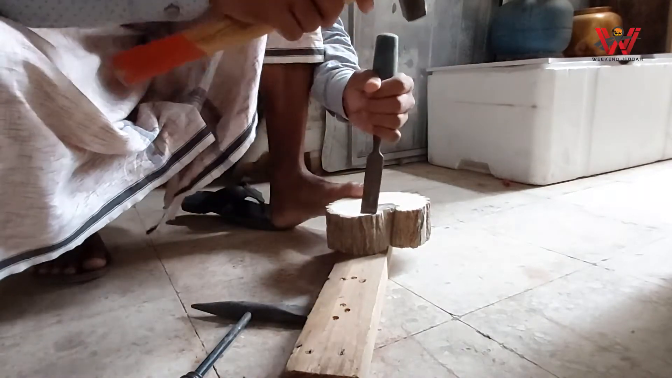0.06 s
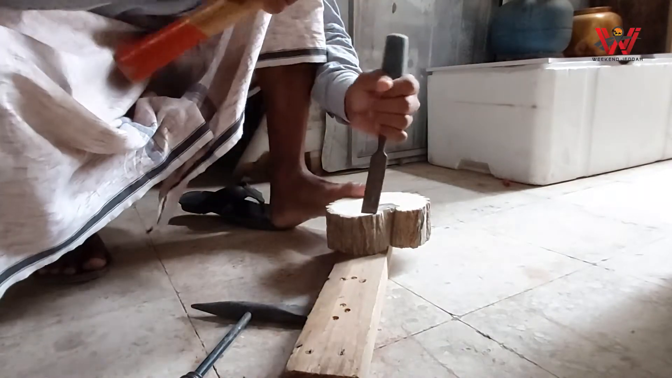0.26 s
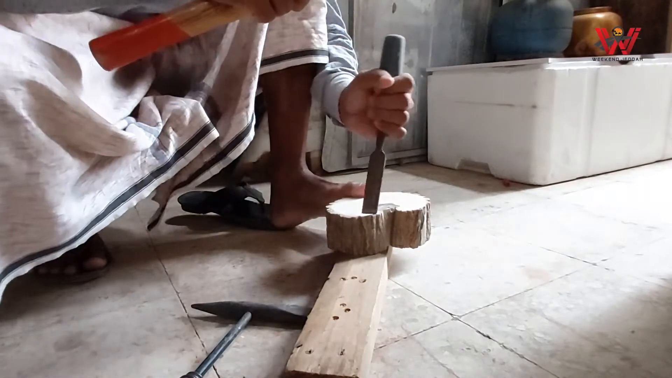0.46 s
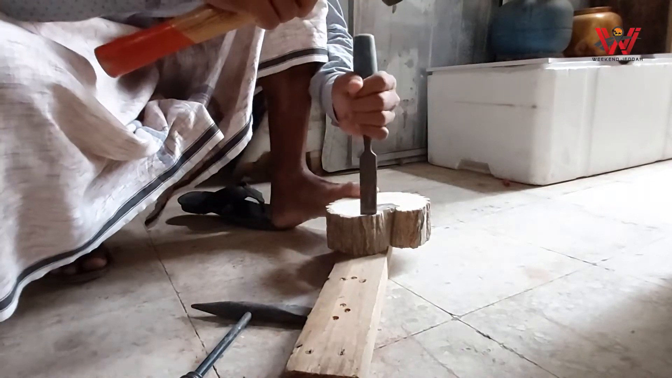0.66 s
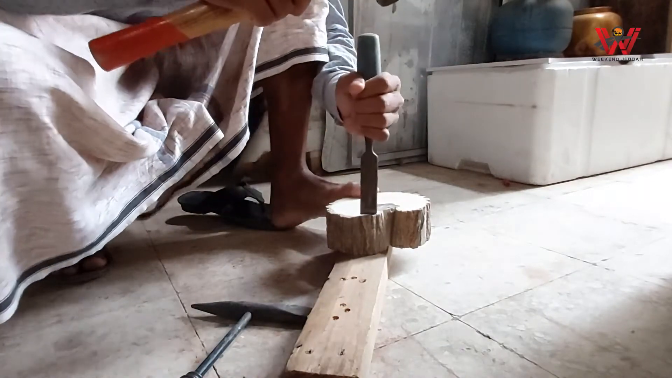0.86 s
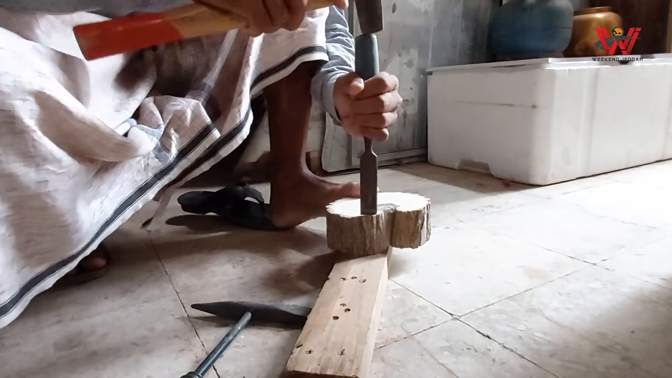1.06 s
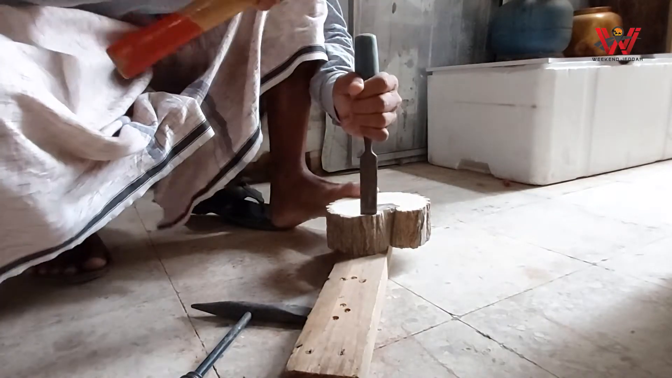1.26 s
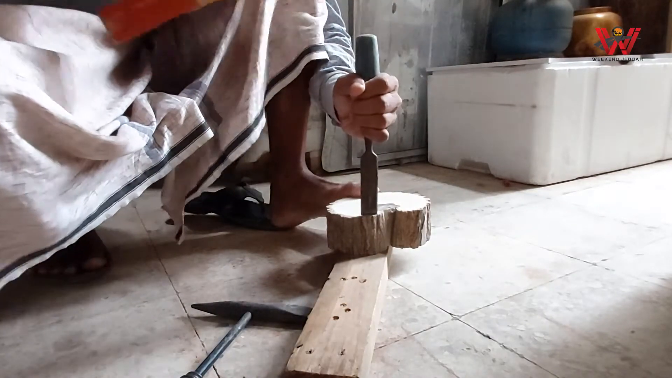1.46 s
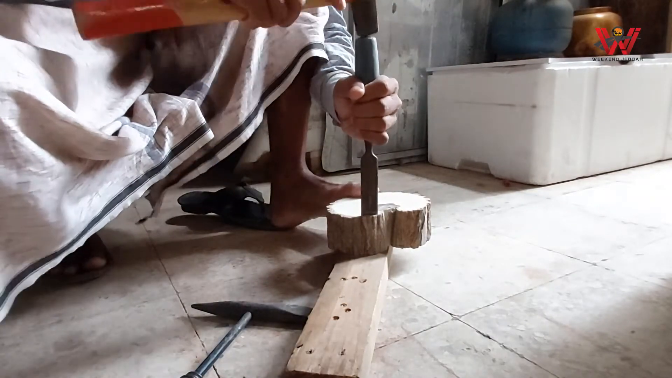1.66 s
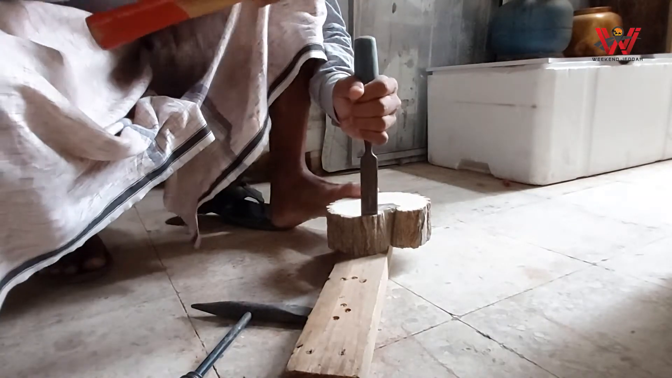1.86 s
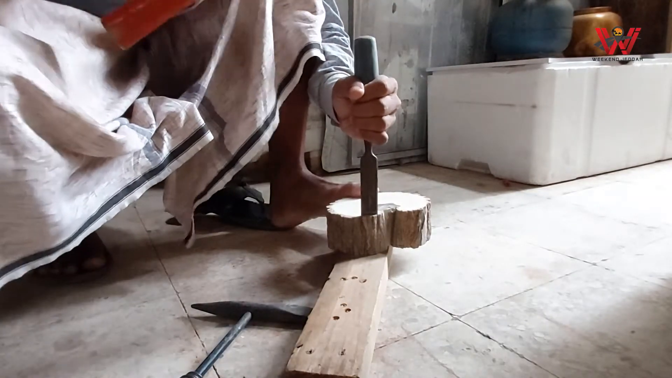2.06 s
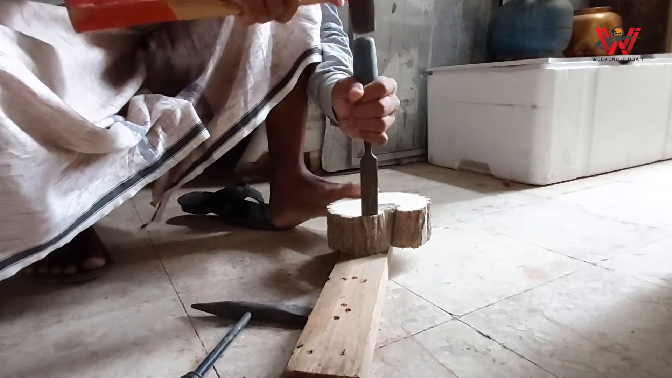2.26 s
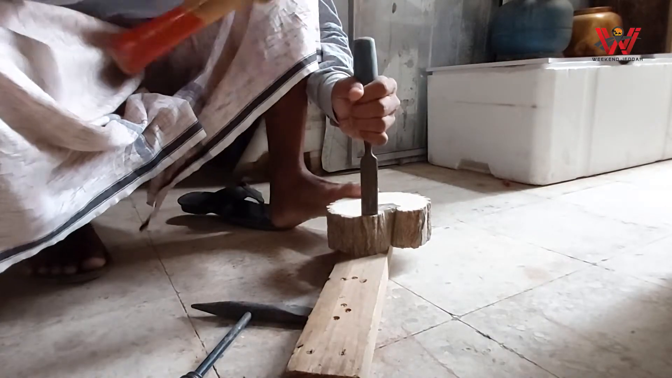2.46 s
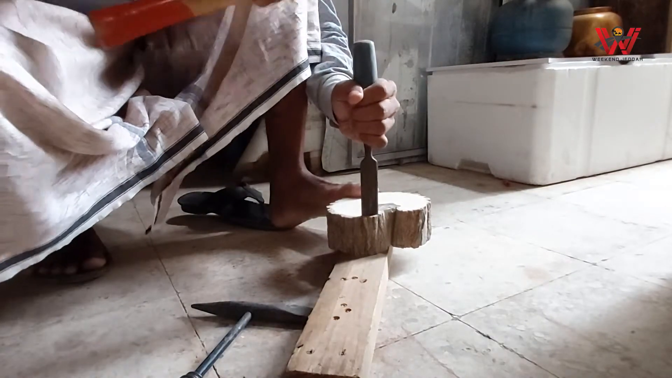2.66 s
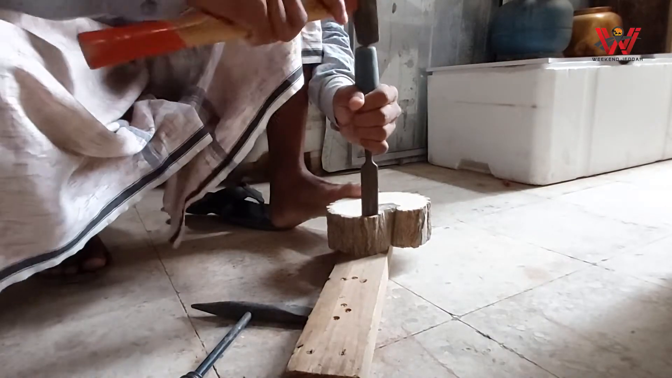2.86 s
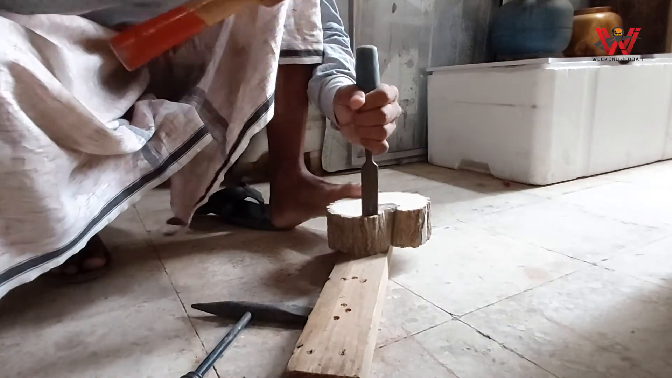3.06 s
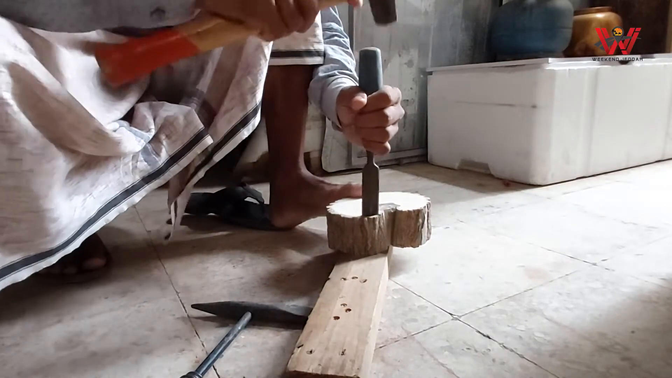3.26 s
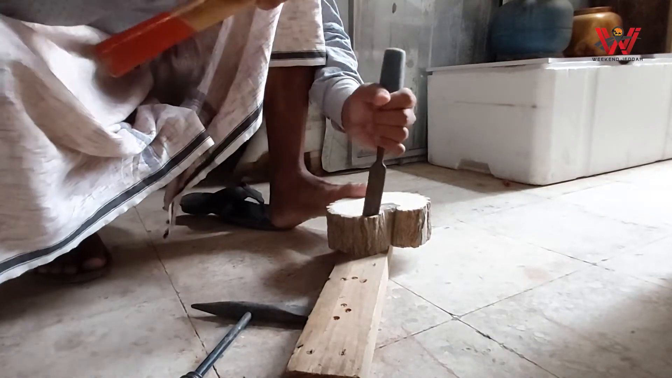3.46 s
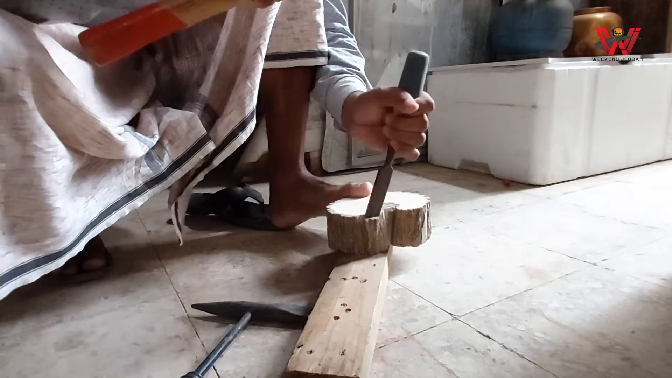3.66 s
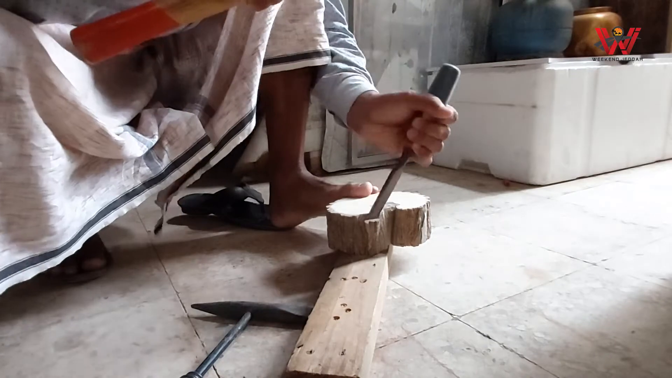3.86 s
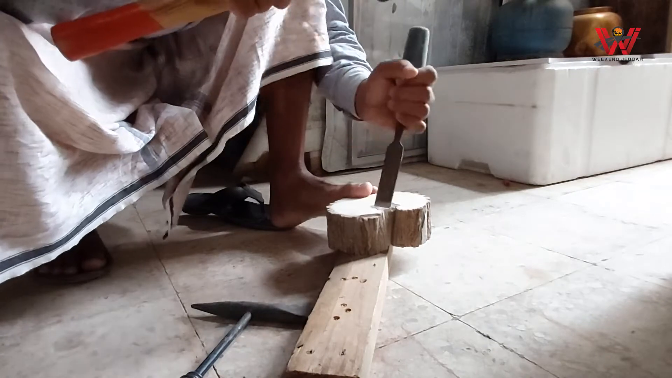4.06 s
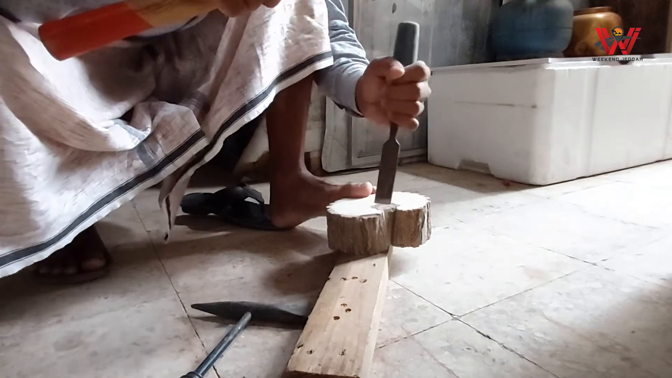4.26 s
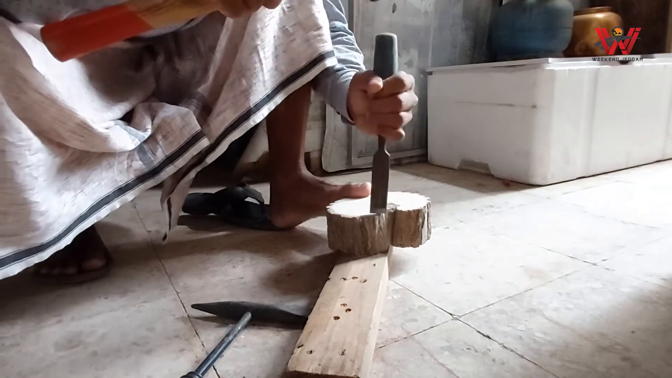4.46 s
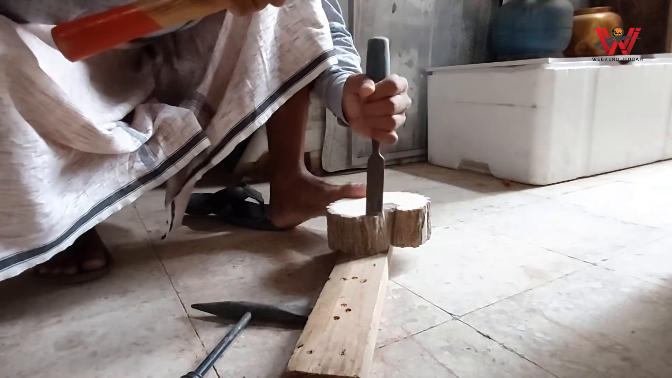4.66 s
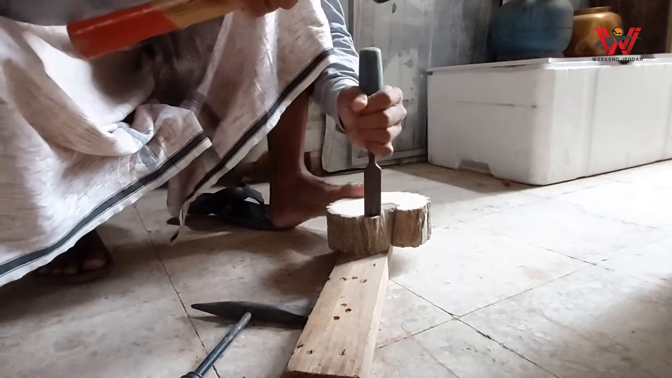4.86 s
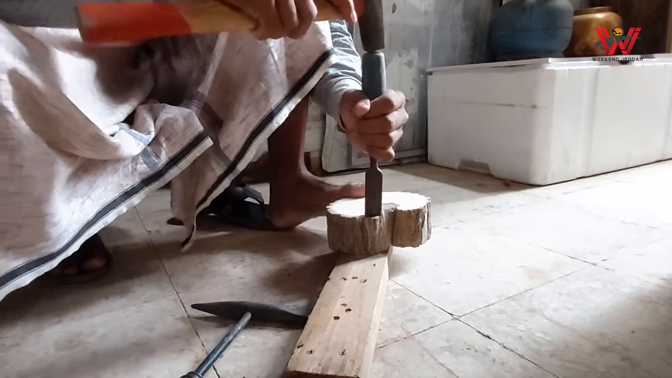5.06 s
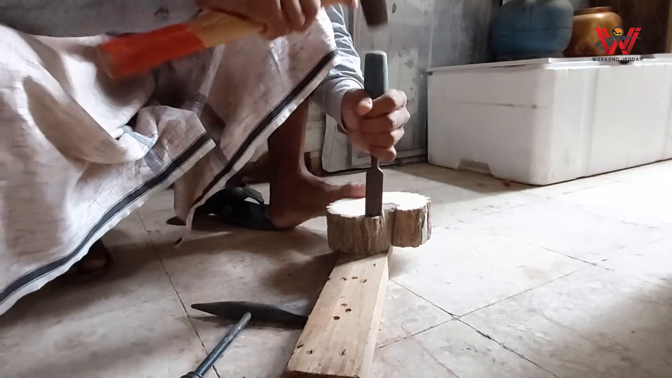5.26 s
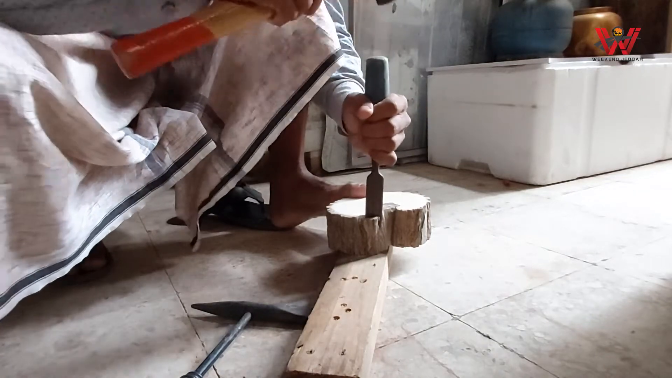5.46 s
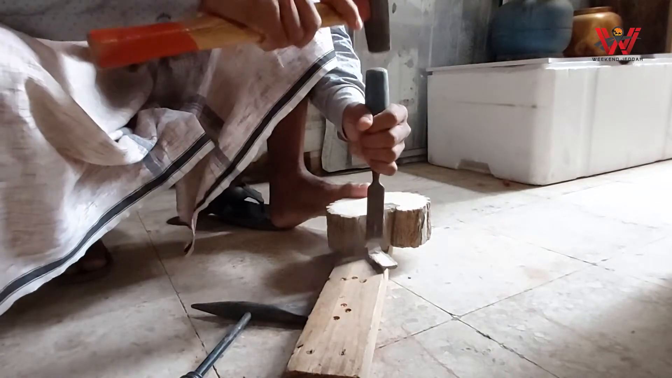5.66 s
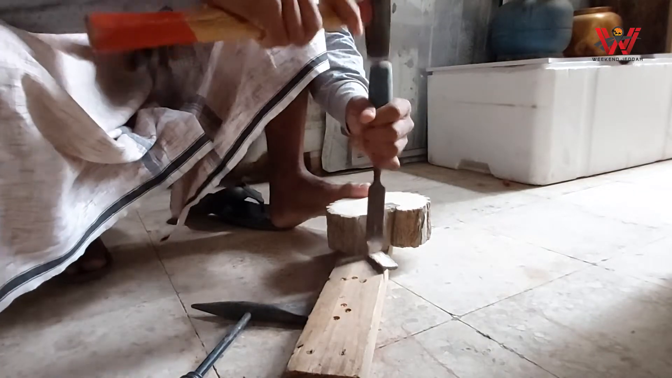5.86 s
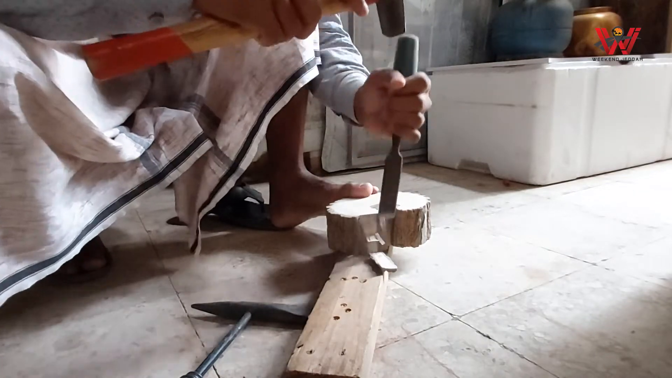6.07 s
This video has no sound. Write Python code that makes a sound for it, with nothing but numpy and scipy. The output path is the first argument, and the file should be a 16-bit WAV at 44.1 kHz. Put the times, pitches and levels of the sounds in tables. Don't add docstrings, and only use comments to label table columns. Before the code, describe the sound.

A hard, bare tiled room, heard close up in stereo, with low distant traffic rumble and thin steady hiss. A faint scrape fades at the start, and a far, hoarse bird whistle falls in pitch around 0.3-0.5 s, with a tiny peep at 0.8. A light knock at 1.1 precedes hammer blows on a chisel at 1.4, 1.7, 2.25, 2.55, 2.9 and a softer one at 3.2. Each is a very short, loud click, then milliseconds later a hollow log knock and floor thump, with slight steel ringing and about half a second of bright reverberation. From 3.5 to 4.8 wood fibres snap in tiny dry ticks, strongest first, with soft scrapes near 4.0 and 4.8. Faster blows follow at 5.1, 5.33, 5.6 and 5.9, duller in ring, the last three with crisp splitting cracks; the hardest hits distort slightly.

```python
import sys
import numpy as np
from scipy import signal
from scipy.fft import rfft, irfft, next_fast_len
from scipy.io import wavfile

SR = 44100
rng = np.random.default_rng(int(sys.argv[2]) if len(sys.argv) > 2 else 0)


def pcm_store(signal):
    levels = np.round(np.clip(np.atleast_2d(signal), -1, 1) * 32767)
    wavfile.write(sys.argv[1], SR, levels.astype(np.int16).T)


def makeup_ratio(level_db):
    decades = np.asarray(level_db, float) / 20
    return 10 ** decades


N = 269627
TIME = np.arange(N) / SR

# (time [s], click level [dB], bright crack level [dB], blade ring level [dB])
BLOWS = [
    (1.366, -1, -10.5, 0),
    (1.696, 3.5, -14, 2),
    (2.254, -1.5, -9, -4),
    (2.55, 5, -13.5, -9),
    (2.884, 2.5, -11.5, -14),
    (3.225, -7, -13, -12.5),
    (5.1, -2, -8.5, -6.5),
    (5.331, 4.5, -10.5, -16),
    (5.598, 4, -8.5, -10),
    (5.917, -2, -11.5, -17),
]
# (frequency [Hz], level [dB], T60 [s])
HANDLE_MODES = [(1900, 6.5, 0.0013), (2610, -5.5, 0.0064), (4150, -13, .005), (7720, -12.5, .005)]
# (frequency [Hz], correlation [-1..1])
LIKENESS = [(60, 0.96), (130, 0.89), (290, 0.8), (640, 0.41), (1400, .0), (15000, 0.021)]


def rms_one(x):
    return x / np.sqrt(np.mean(x ** 2) + 1e-20)


def at_hz(points, hz):
    table_hz, value = np.transpose(points)[:2]
    return np.interp(np.log(hz), np.log(table_hz), value)


def filtered(x, order, hz, kind="low"):
    return signal.sosfilt(signal.butter(order, hz, kind, fs=SR, output="sos"), x)


def drift(rate):
    r = np.exp(-80 * np.pi * rate / SR)
    slow = signal.lfilter([1], [1, -2 * r, r * r], rng.standard_normal(N // 40 + 2002))[2000:]
    return np.interp(np.arange(N) / 40, np.arange(len(slow)), rms_one(slow))


def stereo(mid, side, hz):
    alike = np.clip(at_hz(LIKENESS, hz), -1, 1)
    return np.sqrt(1 + alike) * mid + np.sqrt(1 - alike) * side * [[1], [-1]]


def bands(length, low_hz, high_hz, count):
    white = rng.standard_normal((2, 2, length))
    edges = np.geomspace(low_hz, min(high_hz, .45 * SR), count + 1)
    for k, (low, high) in enumerate(zip(edges, edges[1:])):
        mid, side = filtered(white[k % 2], 2, [low, high], "band")
        hz = np.sqrt(low * high)
        yield hz, stereo(mid, side, hz)


def coloured(spectrum, patchy_db, rate, count):
    out = np.zeros((2, N))
    for hz, band in bands(N, spectrum[0][0], spectrum[-1][0], count):
        out += makeup_ratio(at_hz(spectrum, hz) + patchy_db * drift(rate)) * band
    return rms_one(out)


def smooth_noise(spectrum):
    padded = next_fast_len(N)
    hz = np.maximum(np.arange(padded // 2 + 1) * SR / padded, 10)
    mid, side = rfft(rng.standard_normal((2, padded)))
    shaped = stereo(mid, side, hz) * makeup_ratio(at_hz(spectrum, hz))
    return rms_one(irfft(shaped, padded)[:, :N])


def clicks(times, gains):
    out = np.full(N, 1e-18)
    np.add.at(out, np.round(np.asarray(times) * SR).astype(int), gains)
    return out


def ring(x, hz, t60):
    r, w = makeup_ratio(-60 / (t60 * SR)), 2 * np.pi * hz / SR
    return signal.lfilter([0, np.sin(w)], [1, -2 * r * np.cos(w), r * r], x)


def strike(times, db, modes, spread_db):
    luck = rng.standard_normal((len(times), 3, len(modes)))
    out = np.zeros((2, N))
    for k, (hz, level_db, t60) in enumerate(modes):
        for ear in (0, 1):
            luck_db = spread_db * (luck[:, 0, k] + 0.13 * luck[:, ear + 1, k])
            out[ear] += ring(clicks(times, makeup_ratio(db + level_db + luck_db)), hz, t60)
    return out


def build_up(x, hz, t60):
    r = makeup_ratio(-60 / (t60 * SR))
    return signal.lfilter([1, -1], [1, -2 * r * np.cos(2 * np.pi * hz / SR), r * r], x)


def background():
    # (time [s], level [dB])
    traffic = [(0.0, -46.5), (0.51, -50.5), (1.65, -48.5), (1.92, -53), (3.76, -53.5), (4.12, -49),
               (4.46, -52), (4.83, -46), (5.73, -52.5), (6.11, -48.5)]
    # (frequency [Hz], density [dB per Hz])
    rumble_spectrum = [(13, -44), (22, -20.5), (43, -4), (59, 0), (80, -9.5), (108, 2.5), (123, -4.5),
                       (200, -16.5), (237, 1.5), (356, -22), (380, -27.5), (450, -19.5), (500, -37),
                       (650, -57.5), (1100, -120)]
    air_spectrum = [(210, -26.5), (350, -4), (500, -13.5), (750, -8), (1050, -7), (1500, -12),
                    (2200, -24.5), (3200, -38.5), (4200, -74)]
    hiss_spectrum = [(1500, -33.5), (2500, -3), (3200, -8.5), (4300, -4.5), (5200, -13), (6300, -17.5),
                     (7100, -12), (7900, -0.5), (8800, -7.5), (9400, -14), (11500, -8.5), (14000, -11.5),
                     (15500, -15.5), (16400, -30)]
    traffic_db = np.interp(TIME, *np.transpose(traffic))
    air_db = -57.5 + 0.18 * (traffic_db - traffic_db.mean())
    rumble = makeup_ratio(traffic_db + 4.5) * coloured(rumble_spectrum, patchy_db=3.0, rate=1.7, count=12)
    air = makeup_ratio(air_db) * smooth_noise(air_spectrum)
    hiss = makeup_ratio(-74) * smooth_noise(hiss_spectrum)
    return rumble + air + hiss


def snaps():
    # (time [s], peak level [dB], centre frequency [Hz])
    levered = [(0.0543, -43, 10500), (1.1189, -51, 7180), (3.5402, -19, 6920), (3.5458, -32.5, 6820),
               (3.564, -33, 6320), (3.6005, -48.5, 11000), (3.643, -38, 7790), (3.648, -31.5, 10610),
               (3.7362, -39.5, 8000), (3.75, -47, 9800), (3.7813, -35, 8030), (3.8691, -48, 7600),
               (3.8921, -53, 8030), (4.0362, -38.5, 5380), (4.3196, -65, 8010), (4.4323, -49, 7975),
               (4.5484, -61.5, 7760), (4.7306, -48, 11200), (4.7524, -56, 8150), (4.7955, -38, 7710),
               (4.8171, -39, 8240)]
    # (time [s], peak level [dB], centre frequency [Hz])
    splits = [
        (2.2552, -22, 8600),
        (2.8872, -21, 7900),
        (3.1270, -56, 8000),
        (5.3362, -14, 9075),
        (5.341, -28, 8000),
        (5.6032, -9, 7700),
        (5.9299, -17.5, 7700),
        (5.9355, -35, 8000),
    ]
    decay_s, width_ratio, delay_s, to_walls_db = .0003, 1.12, .0008, 2
    skirt_gain = [[.4], [.4], [1.27]]
    events = list(levered) + list(splits)
    out, after = np.zeros((3, N)), np.arange(300) / SR
    noise = rng.standard_normal((len(events), 2, 300))
    for k, ((s, db, hz), puff) in enumerate(zip(events, noise)):
        direct = (puff + puff.sum(axis=0)) * np.exp(-after / decay_s)
        even = (after == 0) * makeup_ratio(to_walls_db) * (k < len(levered))
        skirt = filtered(np.vstack([direct, even]), 8, 4600, "high")
        peak = filtered(skirt, 1, [hz / width_ratio, hz * width_ratio], "band")
        snap = skirt_gain * skirt + 2 * peak
        out[:, round((s + delay_s) * SR):][:, :300] += makeup_ratio(db + 4.5) * snap / np.abs(snap[:2]).max()
    return out


def scrapes():
    # (peak time [s], level [dB], swell [s], fade [s], grit below the split [dB])
    drags = [
        (0.072, -61.5, .03, 0.86, -12),
        (4.02, -52, 0.078, .10, 5.5),
        (4.81, -49, 0.11, .12, -12.5),
        (4.325, -79, .05, 0.35, 19),
        (1.13, -79.5, .02, .3, 22.5),
    ]
    # (frequency [Hz], density [dB per Hz])
    friction = [(880, -35.5), (1500, -1), (2590, -6), (3770, -16), (5280, -10), (6960, -9), (8000, 1),
                (9010, -5.5), (16000, -10.5)]
    span_db, split_hz = 32.5, 4000
    s, db, swell_s, fade_s, grit_db = np.transpose(drags)[:, :, None]
    away = np.maximum((s - TIME) / swell_s, (TIME - s) / fade_s)
    level = makeup_ratio(db - span_db * away)
    flicker, noise = makeup_ratio(1.5 * drift(60)), smooth_noise(friction)
    grit = (level * makeup_ratio(grit_db)).sum(axis=0) * filtered(noise, 4, split_hz, "low")
    fine = level.sum(axis=0) * filtered(noise, 4, split_hz, "high")
    return flicker * (fine + grit)


def bird():
    # (start time [s], length [s], first pitch [Hz], last pitch [Hz], level [dB])
    chirps = [
        (0.308, .15, 5620, 5660, -64),
        (0.354, 0.16, 5480, 3950, -63.5),
        (.82, 0.065, 6300, 6130, -79),
    ]
    attack_s, sag_db, glide_s = 0.01, 14, .04
    out, waver = np.zeros(N), drift(119)
    for s, length_s, first_hz, last_hz, db in chirps:
        after = np.maximum(TIME - s, 0)
        pitch_hz = last_hz + (first_hz - last_hz) * np.exp(-after / glide_s)
        pitch_hz += 0.39 * np.maximum(5950 - pitch_hz, 0) * waver
        gate = np.clip(np.minimum(after, length_s - after) / attack_s, 0, 1)
        level = makeup_ratio(db - sag_db * np.minimum(after / length_s, 1))
        out += gate * level * np.sin(2 * np.pi * np.cumsum(pitch_hz) / SR)
    return out


def log_on_tiles():
    # (time [s], knock level [dB], pitch factor [1], thump level [dB], handle rattle level [dB])
    knocks = [(1.1198, -24.5, 0.59, -20.5, -55), (1.3690, -5, 0.97, -7, -32), (1.7, -4, 1.06, -9, -8),
              (1.7739, -22, 1.2, -60.5, -29), (2.2584, -3, 0.98, -6, -21.5), (2.553, -7, 1.05, -19, -20),
              (2.887, -14, 0.79, -16, -2), (3.2310, -13, 0.926, -15, -16), (4.4333, -54, .55, -25, -56),
              (5.1053, -19, 1.02, -24, -13.5), (5.107, -20, 0.52, -29, -10.5),
              (5.3365, -12, 0.65, -8.5, 2.5), (5.6027, -23, 1.3, -17, -14), (5.605, -17.5, 0.98, -11, -12),
              (5.6084, -22, 1.1, -11.5, -2.5), (5.6096, -30, 0.62, -23, -12), (5.9303, -27, 1.2, -12, -0.5),
              (5.9358, -21, 1.32, -43, -4), (5.9400, -31, 1.2, -39, -17)]
    # (frequency [Hz], level [dB], T60 [s])
    log_modes = [(724, 2, 0.012), (1062, 6.5, 0.015), (1361, 3, .02), (1750, -8, 0.01)]
    thump_modes = [(150, -5.5, 0.023), (267, 3.5, 0.022), (442, 1, 0.022)]
    contact_s, thump_cut_hz = .00025, 1200
    s, knock_db, pitch, thump_db, rattle_db = np.transpose(knocks)
    thump = filtered(strike(s, thump_db - 8, thump_modes, spread_db=1.5), 2, thump_cut_hz)
    rattle = strike(s, rattle_db - 19.0, HANDLE_MODES, spread_db=8.0)
    out = thump + build_up(rattle, hz=2000, t60=0.0016)
    after = np.arange(2000) / SR
    for at, db, factor in zip(np.round(s * SR).astype(int), knock_db, pitch):
        for hz, level_db, t60 in log_modes:
            fall = makeup_ratio(db - 5.0 + level_db - 60 * after / t60)
            mode = fall * np.sin(2 * np.pi * hz * factor * after)
            out[:, at:at + 2000] += mode * makeup_ratio([[-1.2], [1.2]])
    soft = np.hanning(round(contact_s * SR) + 2)
    return signal.lfilter(soft / soft.sum(), [1], out)


def hammer():
    arrival_s, crack_decay_s = .0013, 0.002
    s, click_db, crack_db = np.transpose(BLOWS)[:3]
    body = strike(s + arrival_s, click_db - 15.5, HANDLE_MODES, spread_db=2.0)
    bright = filtered(rng.standard_normal((2, N)), 2, [3000, 10500], "band")
    hits = clicks(s + arrival_s, makeup_ratio(click_db + crack_db))
    puffs = signal.lfilter([1], [1, -np.exp(-1 / (crack_decay_s * SR))], hits)
    return build_up(body, hz=1920, t60=0.0016) + bright * puffs


def near_field(x):
    # (left lag [ms], right lag [ms], level [dB])
    echoes = [(.9, 1.5, -16), (2.3, 1.9, -15.5), (3.4, 3.7, -18), (5.6, 4.9, -12.5), (7.3, 16, -22)]
    out = x.copy()
    for k, (left_ms, right_ms, db) in enumerate(echoes):
        for ear, ms in enumerate((left_ms, right_ms)):
            lag = round(ms * SR / 1000)
            out[ear, lag:] += (-1) ** (k * ear) * makeup_ratio(db) * x[ear, :-lag]
    return filtered(out, 2, 130, "high")


def radiated():
    # (floor thump [dB], log [dB], handle [dB], steel shank [dB])
    sent = [(1.5, 5.5, 2.5, 0), (-7.5, 2.5, -2, -3.5), (-5, 2.5, -2.5, -6.5), (-12.5, -5.5, -5, -8.5),
            (-5, -10, -7, -9), (0, -6.5, -9.5, -12.5), (-8, -10, -11, -4.5), (-16.5, -13, -15, -11.5),
            (-10, -10, -13.5, -9.5), (-8, -9.5, -11.5, -6)]
    # (frequency [Hz], density [dB per Hz])
    colour = [(50, -31), (110, -8.5), (300, -6.5), (550, -11), (800, -3), (1340, -4), (1780, -4.5),
              (2300, -2.5), (2900, -8.5), (4100, -11), (6000, -23.5), (8000, -16), (10500, -26),
              (16000, -32.5)]
    part_hz = [250, 800, 1400, 2400, 4400, 9000]
    # (frequency [Hz], level [dB], T60 [s])
    blade = [(2440, -29.5, .1), (2574, -30, .11), (2610, -27.5, .13), (2750, -30.5, .11), (4150, -35, 0.11),
             (4290, -36.5, .09), (8100, -30.5, 0.019)]
    hz, after = np.maximum(np.arange(513) * SR / 1024, 10), np.arange(4096) / SR
    spread_hz = np.geomspace(100, 16000, 12)
    spreads = rng.uniform(-1.1, 1, (len(BLOWS), 12))
    for (s, db, _, blade_db), parts, spread in zip(BLOWS, sent, spreads):
        thump_db, log_db, handle_db, shank_db = parts
        edge_db = -0.5 + 0.43 * shank_db
        parts_db = thump_db, log_db, log_db, handle_db, shank_db, edge_db
        colour_db = 26 + at_hz(colour, hz) + at_hz(list(zip(part_hz, parts_db)), hz)
        lag = 300 + 90 * np.interp(np.log(hz), np.log(spread_hz), spread)
        phase = 2 * np.pi * np.cumsum(lag) / 1024
        pulse = np.zeros(len(after))
        for mode_hz, level_db, t60 in blade:
            pulse += makeup_ratio(blade_db + level_db - 60 * after / t60) * np.sin(2 * np.pi * mode_hz * after)
        pulse[:1024] += irfft(makeup_ratio(colour_db) * np.exp(-1j * phase), 1024)
        yield round(s * SR) - 200, makeup_ratio(db) * pulse


def room_responses(count):
    # (frequency [Hz], T60 [s])
    room_t60 = [(100, 0.44), (400, 0.47), (1200, 0.44), (2500, 0.48), (5000, 0.46), (10000, 0.38),
                (15000, 0.42)]
    gap_s, build_s, lumpy_db = 0.0024, 0.017, 1.5
    t = np.arange(SR * 3 // 4) / SR
    build = 1 - np.exp(-np.maximum(t - gap_s, 0) / build_s)
    tails = np.zeros((count, 2, len(t)))
    for hz, band in bands(len(t) + 5000 * count, 62.1, 17000, count=16):
        fall = build * makeup_ratio(-60 * t / at_hz(room_t60, hz))
        band = band * makeup_ratio(lumpy_db * drift(22)[:band.shape[1]])
        for k in range(count):
            tails[k] += band[:, 5000 * k:][:, :len(t)] * fall
    return tails / np.sqrt(np.sum(tails ** 2) / 2 / count)


def room_tail(to_walls):
    shared, *own = room_responses(count=len(BLOWS) + 1)
    tail = signal.fftconvolve(to_walls[None], shared, axes=1)[:, :N]
    for (at, pulse), response in zip(radiated(), own):
        length = min(N - at, response.shape[1])
        tail[:, at:at + length] += signal.fftconvolve(pulse[None], response, axes=1)[:, :length]
    return tail


def scene():
    fibres, chirp, wood = snaps(), bird(), log_on_tiles()
    to_walls = makeup_ratio(-11) * wood.mean(axis=0) + fibres[2] + makeup_ratio(7) * chirp
    direct = near_field(hammer() + wood) + fibres[:2] + scrapes()
    diffuse = room_tail(to_walls) + background()
    return direct + diffuse * makeup_ratio([[-.6], [.6]])


def band_limit(x):
    return signal.sosfilt(signal.butter(12, 16510, fs=SR, output="sos"), x)


def record(dry):
    cut = signal.sosfilt(signal.ellip(8, 1, 50, 15750, fs=SR, output="sos"), dry)
    return band_limit(np.clip(cut, -1, 1))


dry = scene()
out = record(dry)
pcm_store(out)
```